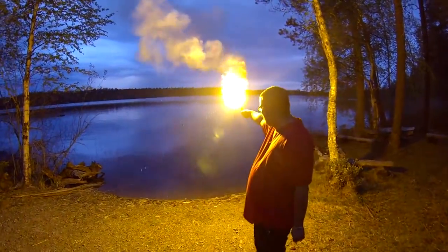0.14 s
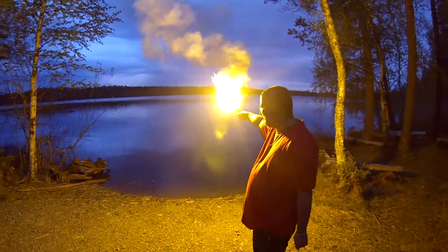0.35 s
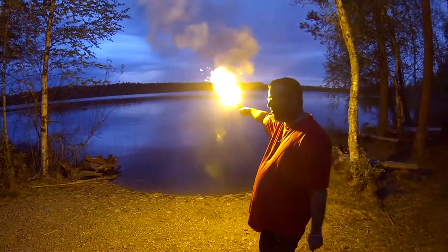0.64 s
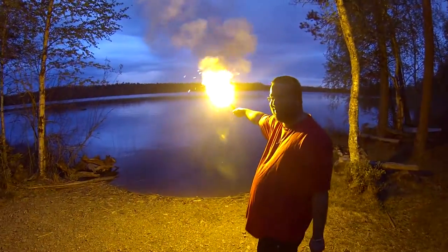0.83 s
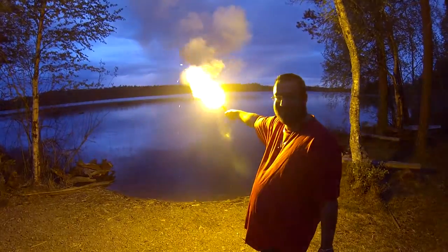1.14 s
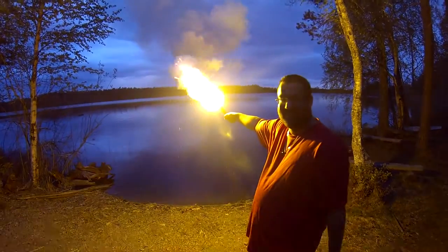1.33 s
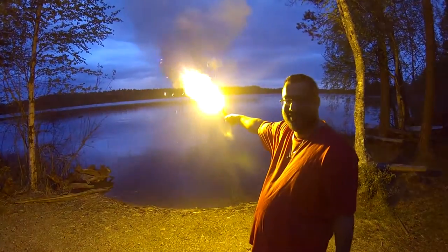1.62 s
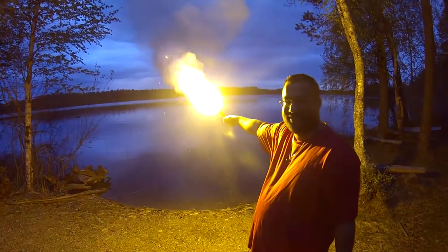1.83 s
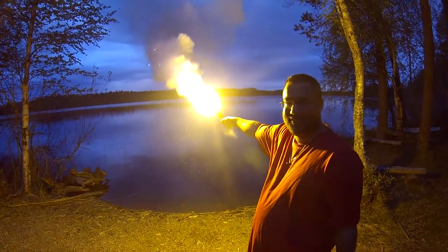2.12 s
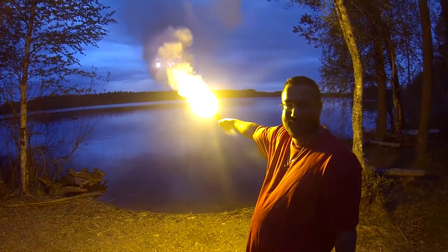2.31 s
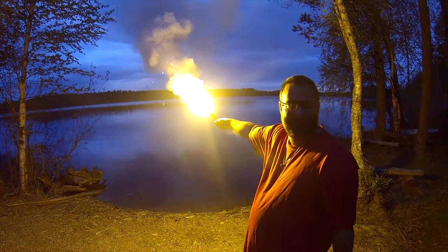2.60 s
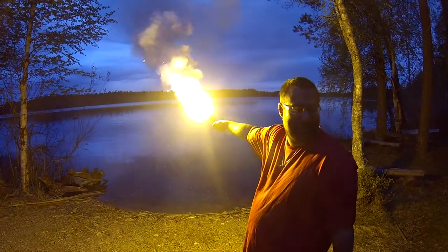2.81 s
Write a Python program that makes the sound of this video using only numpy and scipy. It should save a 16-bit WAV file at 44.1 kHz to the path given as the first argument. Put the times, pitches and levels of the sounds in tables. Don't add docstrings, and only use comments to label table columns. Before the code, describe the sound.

Steady rushing hiss of a burning flare, fine sputtering crackle, low camera rumble and occasional knocks.

```python
import sys
import numpy as np
from scipy import signal
from scipy.fft import rfft, irfft
from scipy.io import wavfile
from scipy.ndimage import uniform_filter1d

SR = 44100
rng = np.random.default_rng(int(sys.argv[2]) if len(sys.argv) > 2 else 0)


def store_wav(level_fs):
    pcm = np.round(np.clip(np.atleast_2d(level_fs), -1, 1) * 32767)
    wavfile.write(sys.argv[1], SR, pcm.T.astype(np.int16))


def voltage_ratio(level):
    return 10 ** (np.asarray(level, float) / 20)


N = 130095

# time_s, level_db
BURN_LEVEL = [(0, -61.5), (.03, -57), (.4, -57), (.75, -55.5), (1.15, -54.5), (1.6, -54), (2.0, -54.5),
              (2.4, -55), (2.95, -54)]


def table(rows, at, log=False):
    a, b = np.transpose(rows)
    return np.interp(np.log(at), np.log(a), b) if log else np.interp(at, a, b)


def rms_one(x):
    return x / np.sqrt(np.mean(x ** 2) + 1e-20)


def drift(rate):
    hop, settle = 40, 2000
    pole = np.exp(-2 * np.pi * rate * hop / SR)
    noise = rng.standard_normal(N // hop + settle + 2)
    slow = signal.lfilter([1], [1, -2 * pole, pole * pole], noise)[settle:]
    return np.interp(np.arange(N) / hop, np.arange(len(slow)), rms_one(slow - slow.mean()))


def coloured(x, gain_db):
    hz = np.maximum(np.arange(N // 2 + 1) * SR / N, 1)
    return irfft(rfft(x) * voltage_ratio(gain_db(hz)), N)


def housing_db(hz):
    # centre_hz, width_hz, gain_db
    peaks = [(978, 177, 6), (1324, 160, 9), (1769, 200, 8), (1850, 40, 6), (2204, 480, 5),
             (3613, 1400, 6.5), (4840, 167, 7.5), (6400, 1800, 1.5), (7300, 1230, 4.5), (10470, 1220, 8.5),
             (12740, 410, 7)]
    # centre_hz, width_hz, gain_db
    dips = [(1154, 39, -6), (1550, 130, -8.5), (2758, 600, -7), (4140, 300, -11), (5610, 330, -7),
            (7100, 320, -3), (8100, 200, -4), (9440, 380, -6), (11600, 590, -2.5)]
    # centre_hz, width_hz, gain_db
    ripples = [(11950, 600, 3), (12400, 350, -3), (13150, 400, 2), (14750, 500, -6)]
    return sum(db / (1 + (2 * (hz - at) / width) ** 2) for at, width, db in [*peaks, *dips, *ripples])


def jet():
    # pitch_hz, density_db_per_hz
    jet_colour = [(200, -13), (600, -16.5), (1200, -17.5), (2000, -7.5), (3000, -17), (6000, -26.5),
                  (10000, -35.5), (15500, -36)]
    # pitch_hz, share
    follows = [(300, 0.13), (1000, 0.2), (2000, 1.6), (4000, 0.13), (7000, 0.9), (10500, 1), (14000, 0.13)]
    # pitch_hz, depth_db
    flutter = [(500, .3), (2000, .3), (4000, .5), (7000, 1.1), (12000, 1.5)]
    # pitch_hz, slope_db_per_s
    turn = [(300, 0.76), (1400, .5), (2000, -0.64), (5000, .1), (8000, 0.1), (10500, 1), (12000, -3),
            (14000, 1.8)]
    burn_db = table(BURN_LEVEL, np.arange(N) / SR)
    from_middle_s = (np.arange(N) - N / 2) / SR
    fast = drift(30)
    fast = fast - uniform_filter1d(fast, size=int(0.08 * SR))
    surge_db = 0.15 * drift(8)

    spectrum = rfft(rng.standard_normal(N))
    hz = np.maximum(np.arange(len(spectrum)) * SR / N, 1)
    spectrum = spectrum * voltage_ratio(table(jet_colour, hz, True) + housing_db(hz)) * (hz > 100)
    spectrum = spectrum / np.std(irfft(spectrum, N))

    hiss = 0
    for k in range(15):
        centre = 150 * 2 ** (k / 2)
        share = np.clip(1 - np.abs(2 * np.log2(hz / centre)), 0, 1)
        db = table(follows, centre, True) * (burn_db - burn_db.mean())
        db = db + table(flutter, centre, True) * fast
        db = db + table(turn, centre, True) * from_middle_s
        db = db + surge_db + 0.5 * drift(2)
        hiss = hiss + voltage_ratio(db) * irfft(spectrum * share, N)
    return voltage_ratio(burn_db.mean() + 1) * hiss


def whistle():
    centre_hz, wander_hz, width_hz = 1844, 70.1, 15.6
    phase = 2 * np.pi * np.cumsum(centre_hz + wander_hz * drift(3.0)) / SR
    note = drift(width_hz) * np.sin(phase) + drift(width_hz) * np.cos(phase)
    clumps_db = 2.3 * drift(4.8)
    return voltage_ratio(table(BURN_LEVEL, np.arange(N) / SR) - 7 + clumps_db) * note


def whine():
    # pitch_hz, rms_db
    tones = [(10644, -81), (10692, -89), (12006, -99), (13188, -93)]
    wander_hz = 3 * drift(3.2)
    total = 0
    for hz, db in tones:
        cycles = np.cumsum(hz + wander_hz) / SR + rng.random()
        total = total + np.sqrt(2) * voltage_ratio(db) * np.sin(2 * np.pi * cycles)
    return total


def rumble():
    # time_s, level_db
    hand = [(0.0, -45.5), (0.25, -39.5), (0.37, -40.5), (0.64, -43.5), (0.85, -44), (1.03, -37),
            (1.31, -43.5), (1.58, -41), (2.5, -46), (2.95, -42.5)]
    # pitch_hz, density_db_per_hz
    rumble_colour = [(4.7, -71), (8.0, -1), (26, -11), (75, -24.5), (98, -32), (125, -33.5), (284, -48.5),
                     (369, -44.5), (400, -47.5), (520, -58), (880, -120)]
    noise = rms_one(coloured(rng.standard_normal(N), lambda hz: table(rumble_colour, hz, True)))
    lumps_db = 1.2 * drift(18)
    return noise * voltage_ratio(table(hand, np.arange(N) / SR) + lumps_db)


def puffs(sizes, length_s, low_hz, tilt_db):
    decay = np.exp(-1 / (length_s * SR))
    burst = signal.lfilter([1], [1, -decay], sizes + 1e-18) * rng.standard_normal(N)

    def gain_db(hz):
        return housing_db(hz) - 10 * np.log10(1 + (low_hz / hz) ** 4) + tilt_db * np.log2(hz / 4000)

    return coloured(burst, gain_db)


def spits():
    # start_s, strength_db
    crumbs = [(.167, 6), (.28, 6), (.51, 6), (1.003, 6), (1.114, 11), (1.216, 6), (1.617, 9), (1.681, 6),
              (1.76, 6), (1.889, 10), (1.978, 7), (2.058, 11), (2.127, 6), (2.72, 6)]
    per_s, spread_db = 150, 3.5
    sizes = voltage_ratio(spread_db * np.minimum(rng.exponential(1, N), 3)) * (rng.random(N) < per_s / SR)
    large = np.zeros(N)
    for start_s, db in crumbs:
        large[int(start_s * SR)] = voltage_ratio(db)
    patter = voltage_ratio(-76.5) * puffs(sizes, length_s=0.0014, low_hz=3330, tilt_db=0)
    return patter + voltage_ratio(-70) * puffs(large, length_s=0.005, low_hz=800, tilt_db=-4)


def struck(rows, column, hz, t60, push_s):
    rows, clicks = np.array(rows), np.full(N, 1e-18)
    clicks[(rows[:, 0] * SR).astype(int)] = np.sign(rows[:, -1]) * voltage_ratio(rows[:, column])
    push = np.hanning(int(push_s * SR) + 3)
    pushes = np.convolve(clicks, push / push.sum())[:N]
    r, w = voltage_ratio(-60 / (t60 * SR)), 2 * np.pi * hz / SR
    return signal.lfilter([0, np.sin(w)], [1, -2 * r * np.cos(w), r * r], pushes)


def knocks():
    # start_s, level_db, direction (+-1)
    jolts = [(.040, -23.5, 1), (.080, -27, 1), (.198, -56, 1), (.321, -37, -1), (.355, -36, -1),
             (.466, -35, -1), (1.082, -30, 1), (1.131, -37, -1), (1.551, -29, -1), (1.955, -56, 1),
             (2.17, -41, 1), (2.426, -30, 1), (2.85, -35, 1)]
    # pitch_hz, t60_s, push_s
    sway = (46.4, 0.11, 0.0059)
    # start_s, body_db, shell_db, direction (+-1)
    hits = [(.047, -35.5, -46, 1), (.098, -47.5, -51, -1), (.203, -42.5, -61, 1), (.228, -54, -57, 1),
            (.325, -45, -65, -1), (.470, -43.5, -41, -1), (1.052, -53, -62, 1), (1.061, -28, -36, -1),
            (1.084, -36, -45.5, 1), (1.170, -42, -73, 1), (1.327, -60, -64, 1), (1.557, -34.5, -45, -1),
            (1.575, -49.5, -58, -1), (1.953, -47.5, -66, 1), (2.055, -48.5, -50, 1), (2.432, -41, -70, 1)]
    # pitch_hz, t60_s, push_s
    modes = [(175, 0.061, 0.0019), (497.4, 0.034, 0.00025)]
    rings = sum(struck(hits, k + 1, *mode) for k, mode in enumerate(modes))
    twin = voltage_ratio(-13) * struck(hits, 1, hz=220, t60=0.085, push_s=0.0023)
    return struck(jolts, 1, *sway) + rings + twin


def scene():
    return (jet() + whistle() + whine() + rumble() + spits() + knocks())[None]


def band_limit(x):
    return signal.sosfilt(signal.butter(12, 15300, fs=SR, output="sos"), x)


def record(dry):
    return band_limit(dry)


dry = scene()
out = record(dry)
store_wav(out)
```